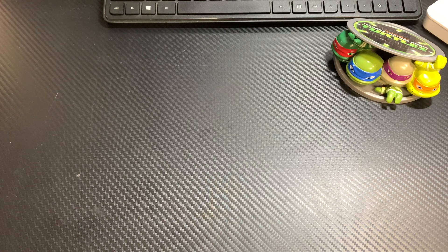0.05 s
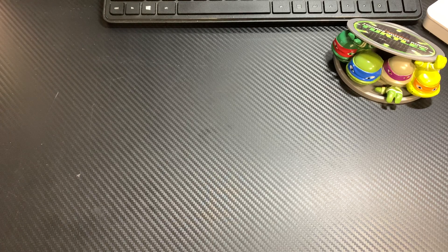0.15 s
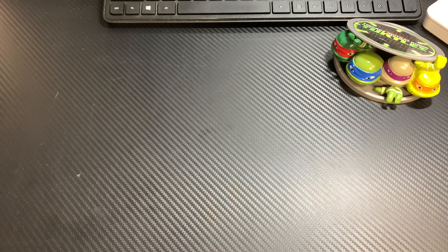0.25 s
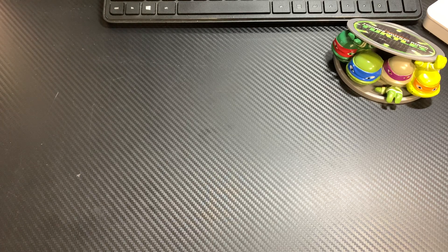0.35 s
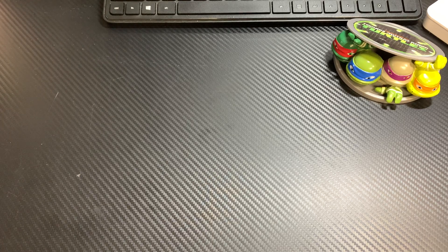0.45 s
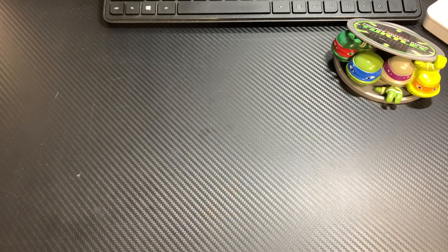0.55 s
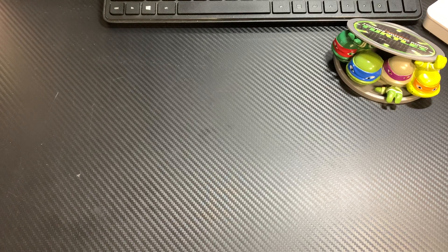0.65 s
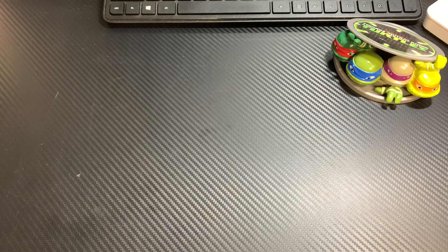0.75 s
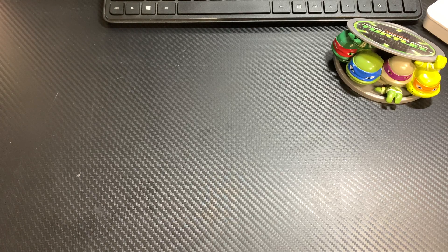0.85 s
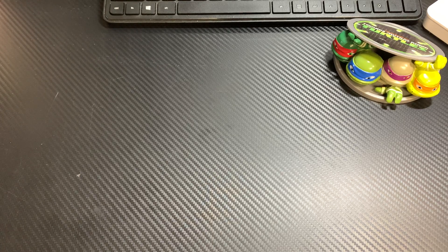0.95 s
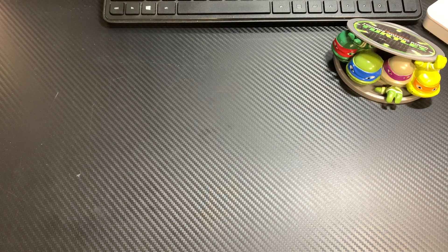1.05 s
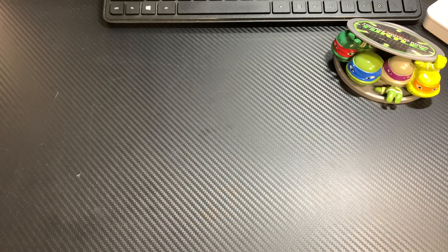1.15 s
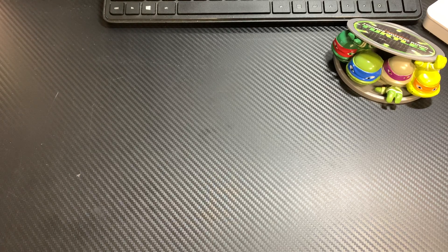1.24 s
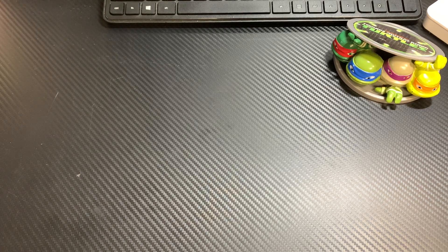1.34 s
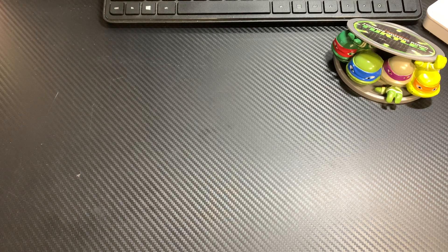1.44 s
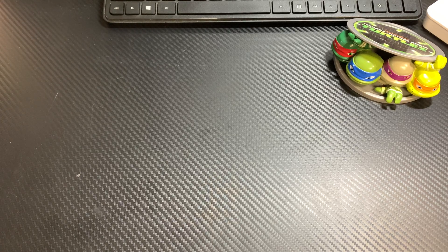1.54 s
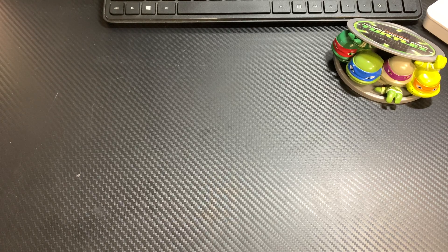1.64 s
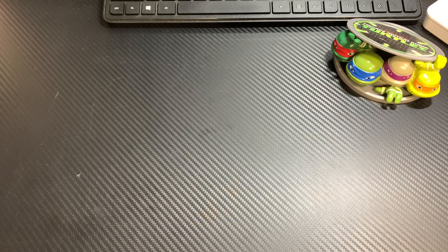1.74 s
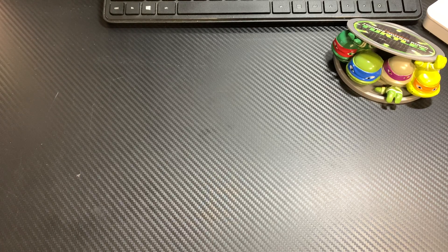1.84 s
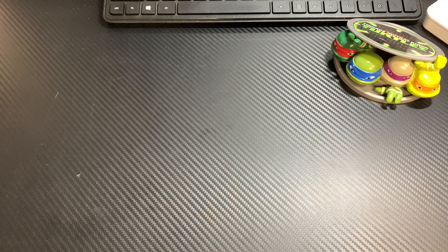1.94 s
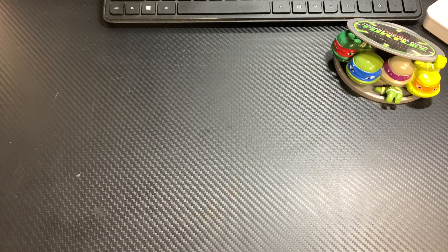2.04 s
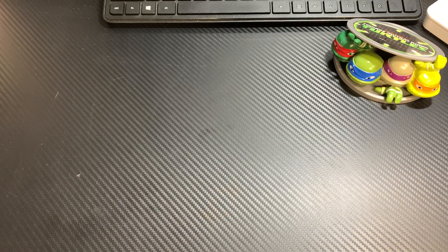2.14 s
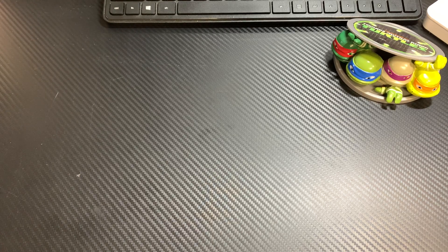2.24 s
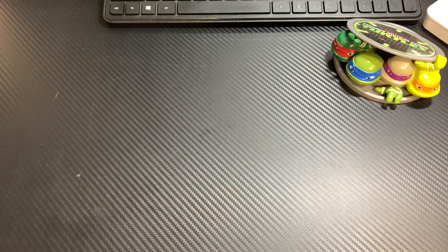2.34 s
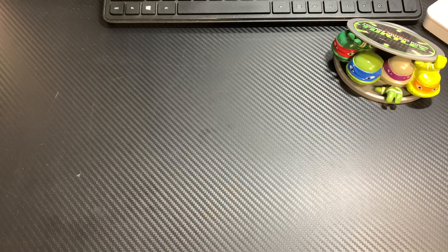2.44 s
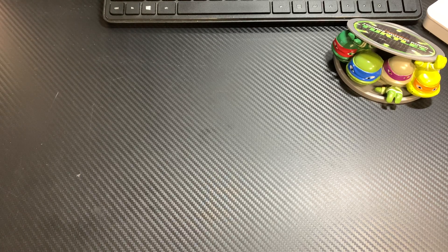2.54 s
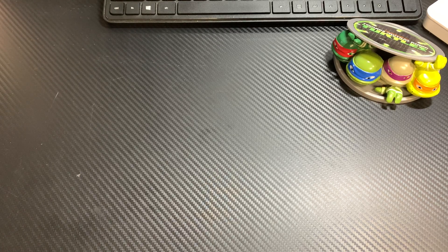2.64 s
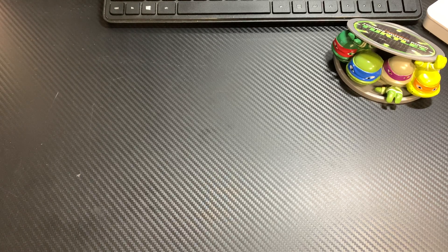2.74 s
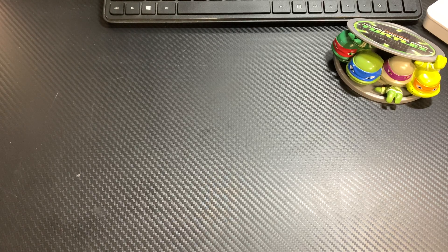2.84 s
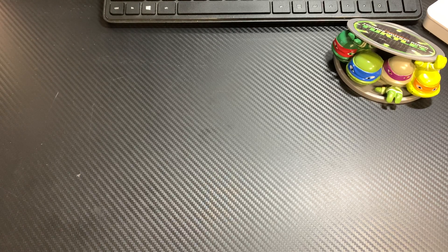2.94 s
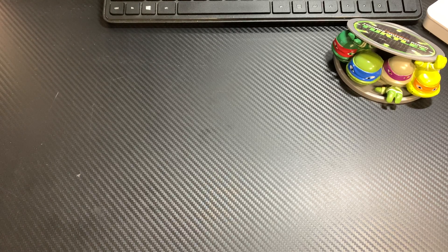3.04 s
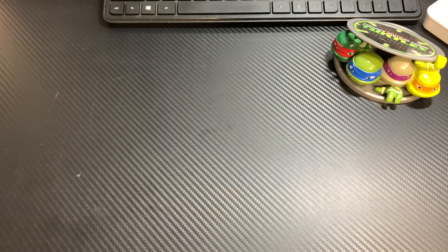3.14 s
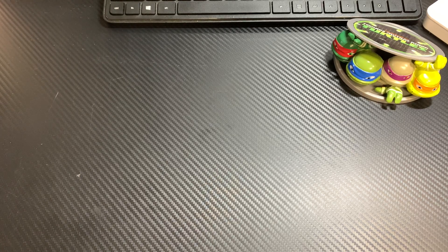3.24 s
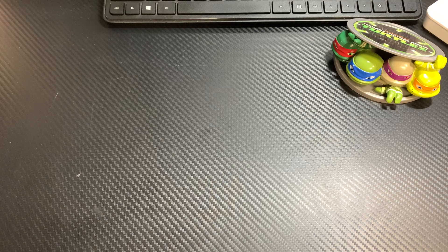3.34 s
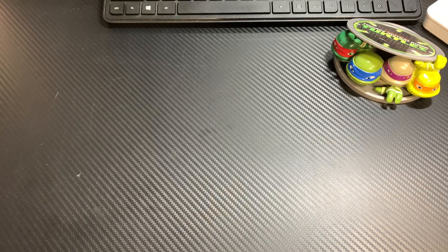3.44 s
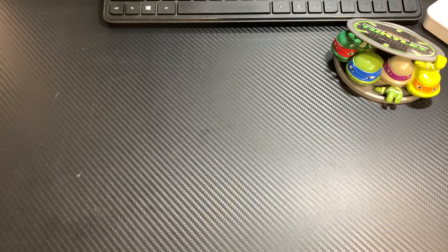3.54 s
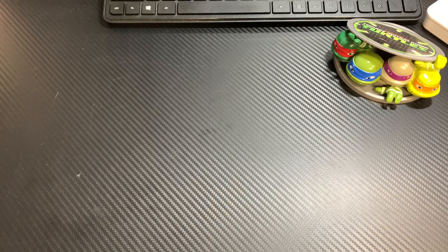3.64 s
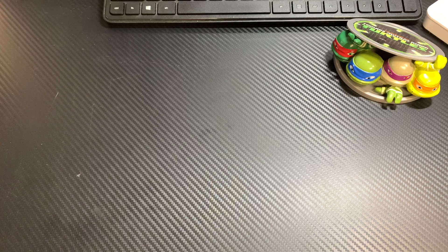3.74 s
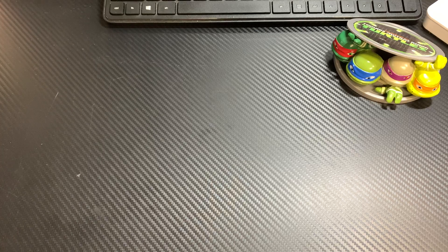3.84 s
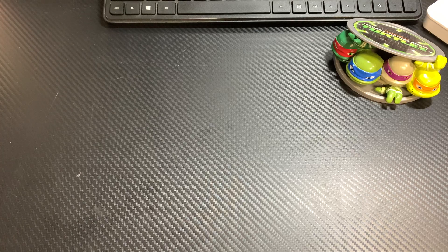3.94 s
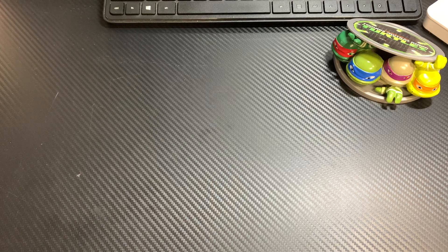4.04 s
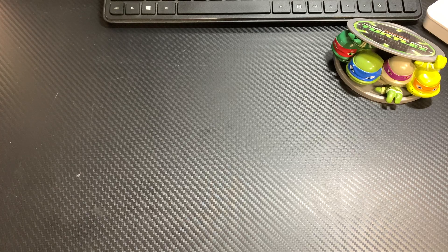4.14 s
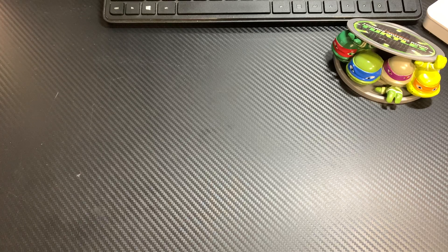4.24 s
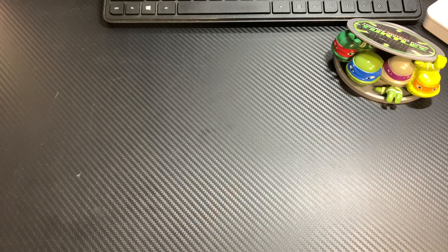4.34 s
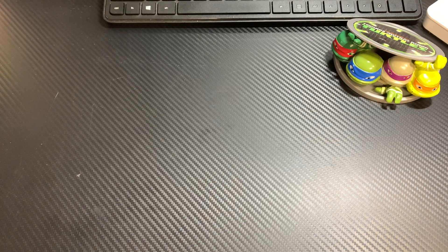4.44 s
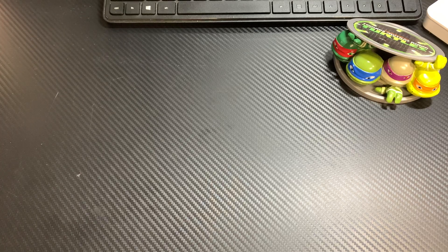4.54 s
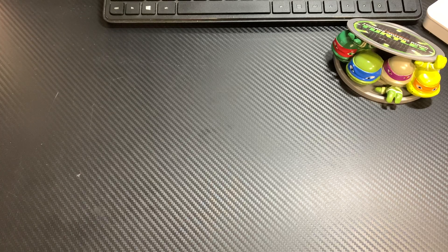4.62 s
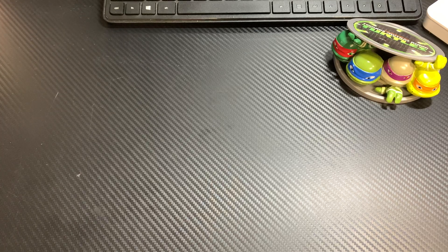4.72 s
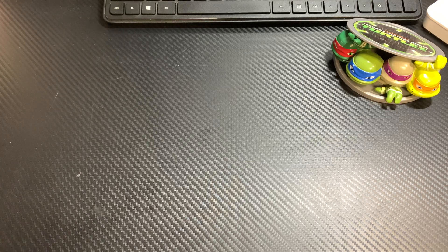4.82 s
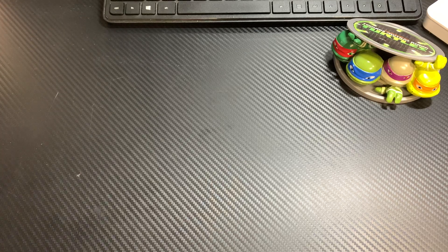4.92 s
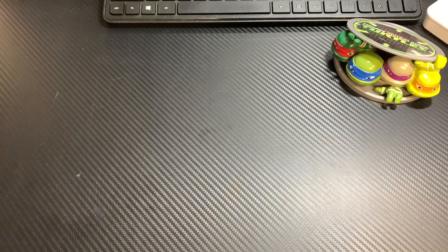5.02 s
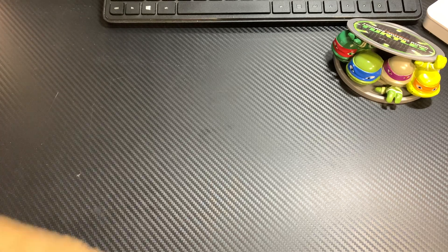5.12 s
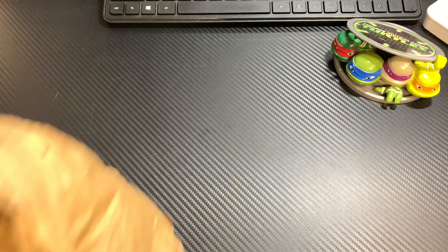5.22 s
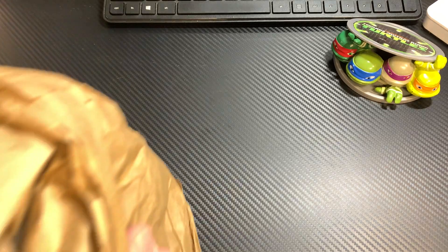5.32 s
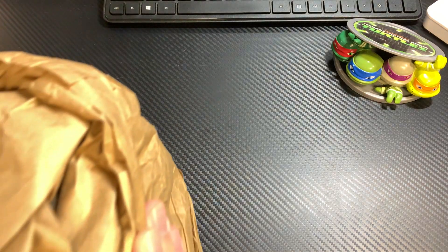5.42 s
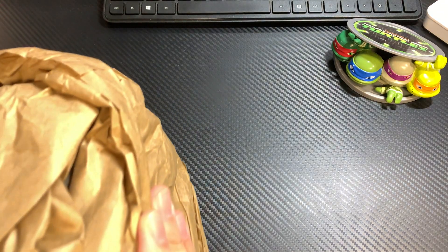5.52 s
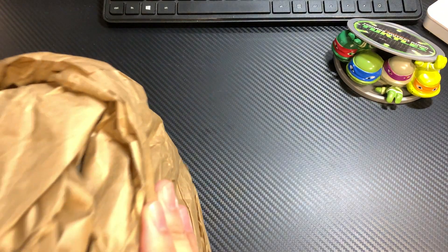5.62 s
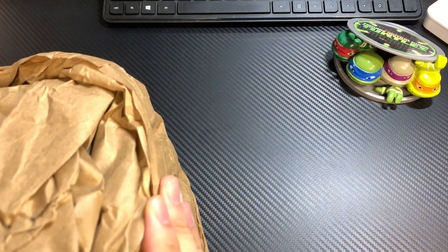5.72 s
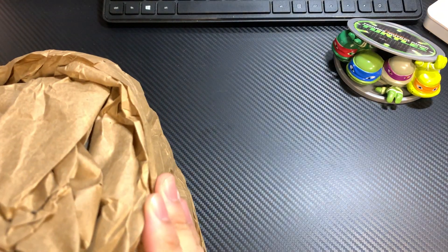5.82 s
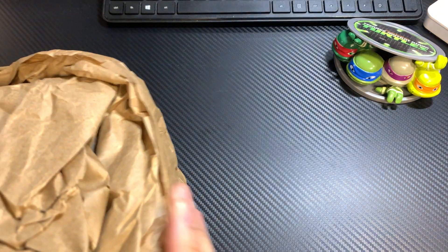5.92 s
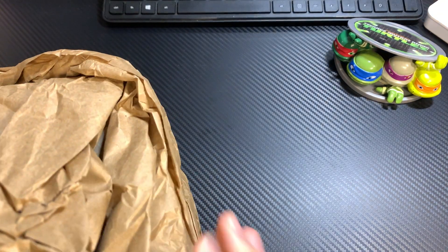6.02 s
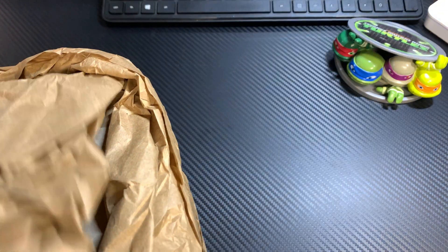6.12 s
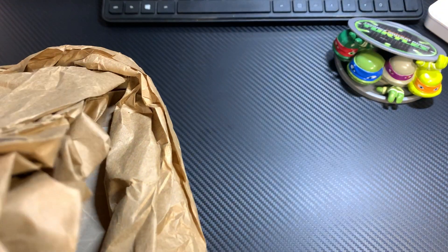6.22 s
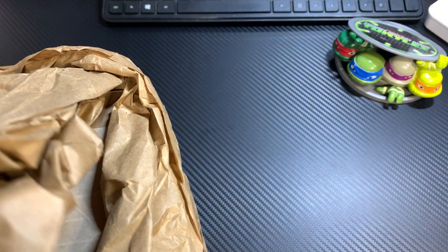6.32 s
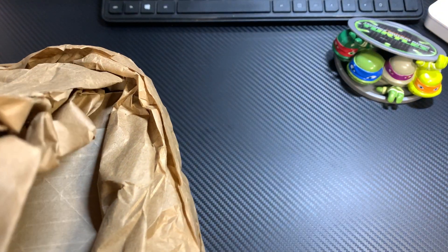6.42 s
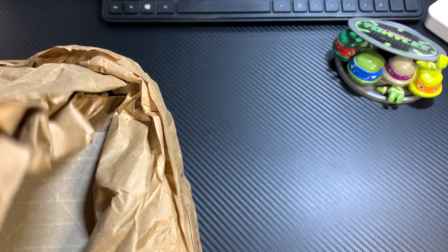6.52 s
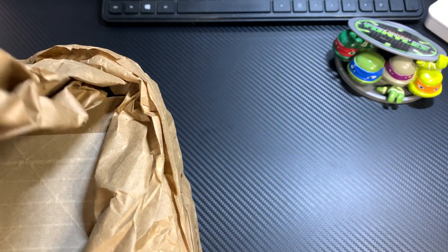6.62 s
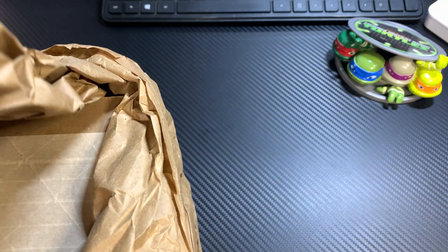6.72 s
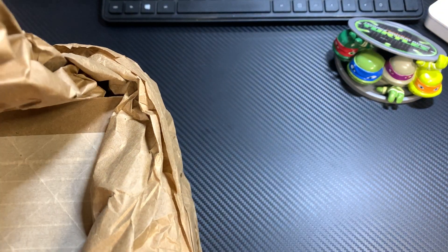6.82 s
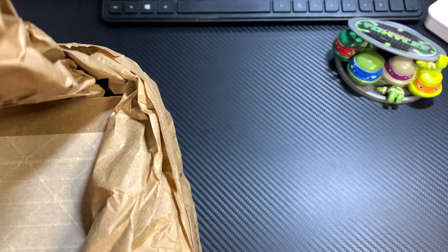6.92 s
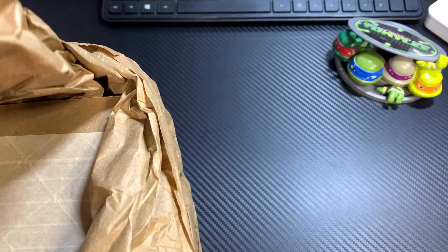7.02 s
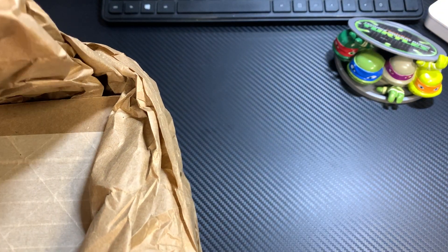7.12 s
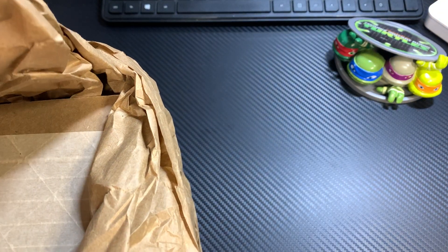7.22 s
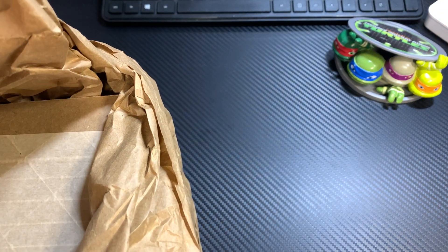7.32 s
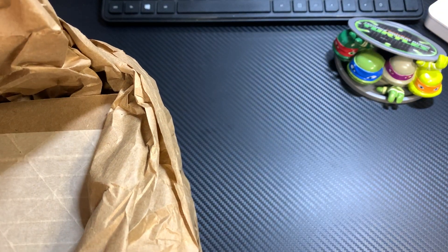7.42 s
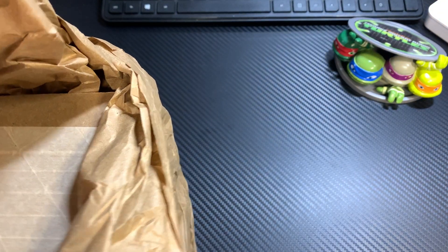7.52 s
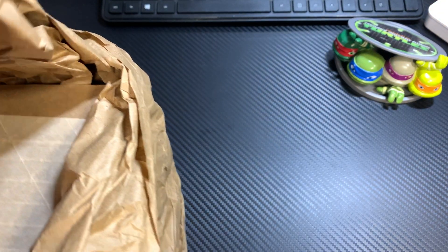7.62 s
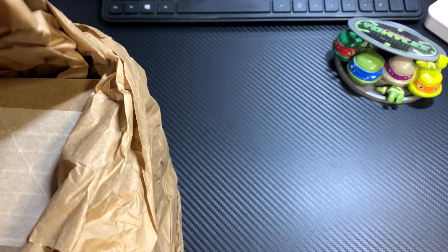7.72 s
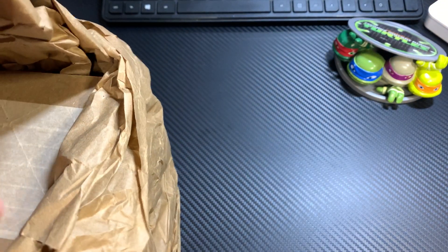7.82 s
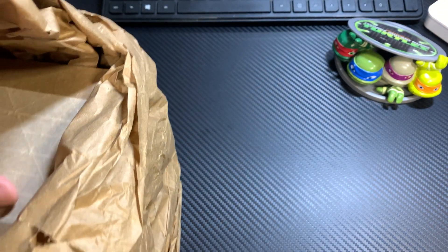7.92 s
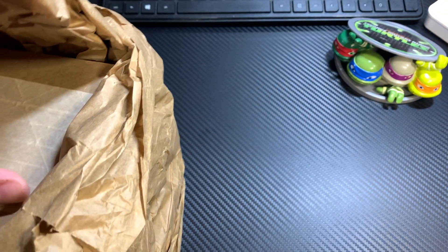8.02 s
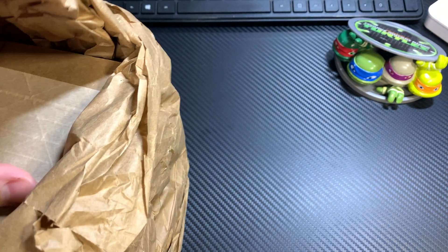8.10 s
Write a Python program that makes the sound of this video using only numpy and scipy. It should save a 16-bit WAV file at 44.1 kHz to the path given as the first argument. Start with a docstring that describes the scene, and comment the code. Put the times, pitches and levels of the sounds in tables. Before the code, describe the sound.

In a small, quiet, dry room, stiff packing paper is pushed about in a cardboard box, first off to the left. A short rustle with soft bumps nearly stops, then loud snaps and a hard box knock follow. Crinkles, hollow tocks, ticks and faint cardboard groans continue. Around five seconds it moves close to the stereo microphone, with thin swishes, brighter cracks and low thumps to the end.

```python
"""Stiff packing paper is pushed about in a cardboard box, heard in a small quiet room.
At first it rustles off to the left with a few box bumps, almost stops after a third of a second, then snaps loudly.
Rustles, hollow fold tocks, lone ticks, desk rumble and short cardboard groans follow, then denser snaps.
From about five seconds paper and box come close: thin swishes, then sharper snaps and bumps to the end.
Paper is made from bursts of shaped noise and moving noise bands, cardboard from ringing tones and low noise."""
import sys
import numpy as np
from scipy import signal
from scipy.fft import rfft, irfft, next_fast_len
from scipy.io import wavfile
from scipy.ndimage import map_coordinates

SR = 44100
rng = np.random.default_rng(int(sys.argv[2]) if len(sys.argv) > 2 else 0)


def transcribe(u):
    """Save the signal u as a 16-bit wav file named by the first command-line argument.

    u: samples, shape (n,) or (channels, n), limited to [-1, 1]; the rate is SR.
    q: integer samples, one column per channel.
    """
    v = np.clip(np.atleast_2d(u).T, -1, 1)
    q = np.round(v * 32767).astype(np.int16)
    wavfile.write(sys.argv[1], SR, q)


N = 359856


def from_db(db):
    """Turn decibels into a gain."""
    return 10 ** (np.asarray(db) / 20)


def to_db(power):
    """Turn power into decibels."""
    return 10 * np.log10(power + 1e-20)


def rms_one(x):
    """Scale a sound to an rms of 1."""
    return x / np.sqrt(np.mean(x ** 2) + 1e-20)


def in_time(rows):
    """Draw straight lines through the rows of a table, giving each column at every sample."""
    s, *columns = np.transpose(rows)
    return [np.interp(np.arange(N) / SR, s, c) for c in columns]


def at_hz(points, hz):
    """Read a table of values on a log-frequency axis."""
    known_hz, values = np.transpose(points)
    return np.interp(np.log(hz + 1), np.log(known_hz), values)


def coloured(x, spectrum):
    """Filter a sound by a spectrum in dB."""
    size = next_fast_len(x.shape[-1])
    gain = from_db(at_hz(spectrum, np.fft.rfftfreq(size, 1 / SR)))
    return irfft(rfft(x, size) * gain, size)[..., :x.shape[-1]]


def drift(rate):
    """Wander at random: straight lines between chance values of spread 1, `rate` of them per second."""
    knots = rng.standard_normal(int(rate * N / SR) + 2)
    return np.interp(np.arange(N) * rate / SR, np.arange(len(knots)), knots)


def add(out, s, sound):
    """Mix a short sound in at a time in seconds."""
    start = int(np.clip(s * SR, 0, N - 1))
    out[:, start:start + sound.shape[-1]] += sound[..., :N - start]


def gesture(s, swell_s, fade_s):
    """Power of one movement: a rounded swell by 20 dB up to its height, then a fade of 20 dB per fade_s."""
    t = np.arange(N) / SR - s
    steps = np.where(t < 0, (t / swell_s) ** 2, t / fade_s)
    return from_db(-20 * np.minimum(steps, 10)) ** 2


def hiss(spectrum):
    """Make smooth noise of a given colour; rms 1."""
    return rms_one(coloured(rng.standard_normal((2, N)), spectrum))


def facets(spectrum, crack_s, ring_db, ring_s, uneven_db, count, size):
    """Facets of paper flick over: each a quick run of tiny slips and a short ring, with its own resonances."""
    t, hz = np.arange(size) / SR, np.fft.rfftfreq(size, 1 / SR)
    # every facet gets chance peaks and dips on top of the common spectrum
    peaks = np.geomspace(100, 18000, num=30)
    tents = np.array([np.interp(hz, peaks, row) for row in np.eye(len(peaks))])
    colour_db = at_hz(spectrum, hz) + uneven_db * rng.standard_normal((count, len(peaks))) @ tents
    slips = rng.laplace(size=(2, count, size))
    waves = rms_one(irfft(rfft(slips) * from_db(colour_db), size))
    rise = 1 - np.exp(-(t / (1.32 * crack_s)) ** 2)
    decay = np.exp(-t / crack_s) + from_db(ring_db) * np.exp(-t / ring_s)
    return waves * rise * decay * (1 - t / t[-1])


def crinkles(busy, spread_db, spectrum, crack_s, ring_db, uneven_db, count=3000):
    """Creases give way at random, mostly small and a few large; busy is the share of them that do; rms 1."""
    times, chance = rng.random((2, count))
    sizes = from_db(spread_db * np.minimum(rng.exponential(1, count), 3.4))
    waves = facets(spectrum, crack_s, ring_db, 0.14, uneven_db, count=count, size=512)
    out = np.zeros((2, N))
    for k in np.flatnonzero(chance < busy[(times * N).astype(int)]):
        add(out, times[k] * N / SR, sizes[k] * waves[:, k])
    return rms_one(out)


def rubbing(spectrum, patchy_db, width_hz, size=1024):
    """Sheets slide and bend: resonances of the pockets between them come and go in the noise; rms 1."""
    hz, _, frames = signal.stft(rng.standard_normal((2, N)), SR, nperseg=size)
    pockets = rng.standard_normal((size // 2, frames.shape[-1]))
    # the patches of pitch are width_hz apart at the bottom and wider higher up
    step = np.log1p(hz / 2500) * 2500 / width_hz
    place = np.meshgrid(step, np.arange(frames.shape[-1]), indexing="ij")
    patches = map_coordinates(pockets, place, order=1)
    colour_db = at_hz(spectrum, hz)[:, None] + patchy_db * patches
    return rms_one(signal.istft(frames * from_db(colour_db), SR, nperseg=size)[1][:, :N])


# how far paper and box have come under the microphone: (time [s], nearness [share 0-1])
NEARNESS = [(4.9, 0.41), (5.7, 1)]


def nearness():
    """The share of the sound that comes from close by, at every sample."""
    return in_time(NEARNESS)[0]


# colour of the quiet air: (frequency [Hz], level [dB per Hz])
AIR_SPECTRUM = [(20, -26), (70, -1), (250, 9), (900, 0.5), (4000, -6), (16000, -72)]


def room_air():
    """The air of the room is a faint, steady noise."""
    return from_db(-68.5) * hiss(AIR_SPECTRUM)


def room(x, t60, wet_db, size=22050):
    """Desk and walls return a short tail: fading noise, dullest in the top treble, that starts 4 ms late."""
    t = np.arange(size) / SR
    tail = coloured(rng.standard_normal((2, size)), [(200, -3.5), (2000, 3.0), (6000, -2), (16000, -5.0)])
    tail = tail * from_db(-60 * t / t60) * (t > .004)
    tail = tail / np.sqrt(np.sum(tail[0] ** 2))
    return x + from_db(wet_db) * signal.oaconvolve(x, tail, axes=1)[:, :N]


# shoves of the box, before a fixed trim:
# (time of the height [s], deep rumble level [dB], wall flutter level [dB])
SHOVES = [(0.0, -33, -31.5), (0.13, -41, -39.5), (0.26, -57, -52), (0.86, -51, -62), (1.072, -57, -40),
          (2.0, -45, -62), (2.4, -39.5, -41.5), (2.75, -47, -45.5), (3.61, -44, -70), (4.05, -46, -45),
          (4.58, -46, -52), (5.8, -40.5, -59), (6.23, -37, -53), (6.93, -42, -43.5), (7.52, -59, -32),
          (7.61, -44, -52), (7.75, -38, -55)]
# colour of the rumble on the desk: (frequency [Hz], level [dB per Hz])
RUMBLE_SPECTRUM = [(20, -48), (35, -31), (48, -4.5), (80, -0.5), (105, -5.5), (135, -7.5), (170, -15.5),
                   (400, -47)]
# colour of the fluttering walls: (frequency [Hz], level [dB per Hz])
FLUTTER_SPECTRUM = [(70, -45), (140, 3.5), (190, -13.5), (265, 2), (370, -8.5), (600, -15), (1500, -33)]
SHOVE_SWELL_S, SHOVE_FADE_S = 0.051, 0.13
# rubbing paper drags the box along: dB against the rubbing, and how unevenly
DRAG_RUMBLE_DB, DRAG_FLUTTER_DB, DRAG_UNEVEN_DB = -22, -16, 6


def shifting(rubbing_db):
    """The box rumbles on the desk and its walls flutter: a little as the paper rubs, more when shoved."""
    drag_db = np.array([[DRAG_RUMBLE_DB], [DRAG_FLUTTER_DB]])
    power = from_db(rubbing_db + DRAG_UNEVEN_DB * drift(14) + drag_db) ** 2
    for s, rumble_db, flutter_db in SHOVES:
        shove = gesture(s, SHOVE_SWELL_S, SHOVE_FADE_S)
        power = power + from_db([[rumble_db], [flutter_db]]) ** 2 * shove
    rumble_db, flutter_db = to_db(power)
    rumble = from_db(rumble_db - 4.0) * hiss(RUMBLE_SPECTRUM)
    flutter = from_db(flutter_db - 3.0) * rubbing(FLUTTER_SPECTRUM, patchy_db=4.0, width_hz=51.0)
    return rumble + flutter


# cardboard dragging on cardboard; pitch and level waver, level before a trim:
# (time [s], length [s], pitch [Hz], level [dB])
GROANS = [(0.11, 0.093, 518, -48.5), (3.41, 0.13, 139, -44.5), (4.2, 0.085, 255, -49),
          (4.225, 0.11, 145, -43.5), (5.362, 0.17, 260.4, -58)]


def groans():
    """Cardboard sticks and slips at an unsteady rate, in a brief low tone."""
    out = np.zeros((2, N))
    for s, length_s, hz, level_db in GROANS:
        swell = signal.windows.tukey(int(length_s * SR), .6)
        turns = np.cumsum(hz * (1 + 0.013 * drift(114)[:len(swell)])) / SR
        loudness = from_db(level_db + 1.0 + 3.5 * drift(70)[:len(swell)])
        add(out, s, loudness * swell * np.sin(2 * np.pi * turns))
    return out


# blows on the box: (time [s], peak level of the bulge [dB], centre of the blow [Hz])
BUMPS = [(0.002, -32, 110), (0.11, -40, 199), (0.232, -50, 290), (1.038, -17, 490), (1.042, -18.5, 286),
         (1.071, -34, 460), (4.051, -35, 333), (4.558, -26.5, 428), (4.561, -33.5, 92.5),
         (5.134, -36.5, 232), (5.174, -38, 140), (5.684, -22, 76), (5.733, -35, 121), (6.206, -30, 87),
         (6.323, -34.5, 170), (6.331, -29.5, 480), (6.629, -34.5, 334), (6.858, -33.5, 126),
         (6.911, -29.5, 193), (7.281, -29.5, 266), (7.509, -28, 229), (7.588, -31, 96), (7.737, -23.5, 526)]
# tones of the cardboard walls, varied at each blow:
# (usual pitch [Hz], usual strength [dB], time to fade by 60 dB [s])
WALL_TONES = [(82, -18, 0.2), (133.5, -7, 0.15), (196, -6, 0.079), (263.3, -3, 0.09), (320, -10, 0.18),
              (466, 9, 0.11)]
# a wall bulges and springs back; its tones ring on more faintly
BUMP_CYCLES, BUMP_CONTACT_S, BUMP_RING_DB = 2.1, 0.008, -10.5


def bumps(size=22050):
    """Each blow bends a wall for a few cycles, then the cardboard tones near its pitch ring on."""
    out, t = np.zeros((2, N)), np.arange(size) / SR
    hz, tone_db, t60 = np.transpose(WALL_TONES)[:, :, None]
    for s, peak_db, centre_hz in BUMPS:
        length_s = BUMP_CONTACT_S + BUMP_CYCLES / centre_hz
        push = np.sin(np.pi * np.minimum(t / length_s, 1)) ** 2
        bulge = push * np.exp(2j * np.pi * centre_hz * t)
        # tones far from the pitch of the blow are weaker
        far_db = 3.1 * np.log2(hz / centre_hz) ** 2
        strength = from_db(tone_db - far_db + 1.5 * rng.standard_normal(hz.shape))
        bent_hz = hz * (1 + 0.03 * rng.standard_normal(hz.shape))   # the walls flex under the hand
        tones = np.exp(2j * np.pi * (bent_hz * t + rng.random(hz.shape)))
        ring = np.sum(strength * tones * from_db(-60 * t / t60), axis=0)
        ring = ring * (1 - np.exp(-(t / length_s) ** 2))
        knock = from_db(peak_db) * (bulge + from_db(BUMP_RING_DB) * ring / np.abs(ring).max())
        # the two parts are the same knock a quarter turn apart
        add(out, s, np.array([knock.real, knock.imag]))
    return out


# resonances of the hollow box, which shift about these values:
# (centre [Hz], distance to either side where the lift has dropped to 37 % [Hz], usual lift [dB])
HOLLOW = [(475, 45, 5), (1140, 70, 3), (1400, 50, 3), (2030, 70, 3)]
# the paper shifts inside: share of the pitch, share of the lift, rate
HOLLOW_BEND, HOLLOW_COMES_AND_GOES, HOLLOW_CHANGES_PER_S = .05, .9, 8


def in_box(x, size=2048):
    """Standing waves between the box walls lift some pitches; they bend, come and go as the paper shifts."""
    hz, s, frames = signal.stft(x, SR, nperseg=size)
    now, colour_db = np.minimum((s * SR).astype(int), N - 1), 0
    for centre_hz, width_hz, lift_db in HOLLOW:
        bent_hz = centre_hz * (1 + HOLLOW_BEND * drift(HOLLOW_CHANGES_PER_S)[now])
        depth = 1 + HOLLOW_COMES_AND_GOES * drift(HOLLOW_CHANGES_PER_S)[now]
        depth_db = lift_db * np.clip(depth, 0, np.sqrt(2))
        colour_db = colour_db + depth_db * np.exp(-((hz[:, None] - bent_hz) / width_hz) ** 2)
    return signal.istft(frames * from_db(colour_db), SR, nperseg=size)[1][:, :N]


# a taut sheet slides over the rim, its level wavering:
# (time of the height [s], swell [s], fade by 20 dB [s], usual level [dB])
SWISHES = [(5.0, 0.078, 0.22, -34.5), (5.14, 0.07, 0.048, -31), (5.24, .08, 0.16, -37.5),
           (6.195, 0.038, 0.13, -27)]
# colour of the swish: (frequency [Hz], level [dB per Hz])
SWISH_SPECTRUM = [(3000, -30), (4900, -24), (5600, 6), (6600, 0), (7500, 1), (9000, -12), (15000, -11)]


def swishes():
    """A sheet drawn over the rim hisses thinly, in a narrow, shifting band."""
    power = 0
    for s, swell_s, fade_s, level_db in SWISHES:
        power = power + from_db(level_db) ** 2 * gesture(s, swell_s, fade_s)
    waver = from_db(1.8 * drift(250))
    return np.sqrt(power) * waver * rubbing(SWISH_SPECTRUM, patchy_db=7.0, width_hz=160.5)


# broad folds that flip over, before the trim FOLD_DB: (time [s], level [dB], pitch [Hz])
FOLDS = [(0.831, -30, 1170), (1.041, -22, 2020), (1.043, -23, 1730), (1.089, -31.5, 1200),
         (1.578, -22.5, 1010), (1.738, -26, 1380), (1.900, -31, 1670), (1.906, -29, 840),
         (2.265, -28.5, 1210), (2.284, -23, 810), (2.439, -35, 1410), (2.588, -30.5, 1270),
         (2.931, -34, 1800), (3.19, -35.5, 850), (3.027, -36, 880), (3.065, -29, 3220), (3.31, -26, 950),
         (3.869, -29, 1660), (4.019, -26.5, 785), (4.56, -27, 1100), (4.6277, -21.5, 1290),
         (4.672, -29.5, 1050), (4.837, -24, 695), (5.136, -29, 1450), (5.174, -19, 1390),
         (5.259, -23, 2040), (5.7622, -20.5, 960), (5.828, -37, 1400), (5.934, -21, 1530),
         (6.332, -18.5, 1600), (6.4768, -21, 1600), (6.627, -21.5, 1150), (7.054, -31, 1730),
         (7.2598, -24, 1700), (8.061, -17, 1130), (8.0609, -15.5, 2300)]
FOLD_DB = -3
FOLD_RISE_S, FOLD_FADE_S = .001, .0042
FOLD_WIDTH_HZ, FOLD_SKIRT_DB = 330, -16   # width of the resonance, and the broad sound around it


def folds(size=2048):
    """A broad fold flips with a hollow tock: a brief flurry of slips rings the pocket of paper behind it."""
    out, t, hz = np.zeros((2, N)), np.arange(size) / SR, np.fft.rfftfreq(size, 1 / SR)
    shape = (1 - np.exp(-(t / FOLD_RISE_S) ** 2)) * np.exp(-t / FOLD_FADE_S)
    for s, level_db, pitch_hz in FOLDS:
        ratio = hz / pitch_hz
        resonance = 1 / (1 + 2j * (hz - pitch_hz) / FOLD_WIDTH_HZ)
        skirt = from_db(FOLD_SKIRT_DB) * ratio / (1 + (ratio / 2) ** 3)
        slips = rng.standard_normal((2, size))
        tock = shape * irfft(rfft(slips) * (resonance + skirt), size)
        level = from_db(level_db + FOLD_DB) * np.sqrt(FOLD_FADE_S * SR / size)
        add(out, s, level * rms_one(tock))
    return out


# creases that snap, before fixed trims:
# (time [s], crack level [dB], sheet against the crack [dB], top treble against the crack [dB])
SNAPS = [(0.466, -57.5, -12, -16), (0.8859, -25.5, -7, -6), (0.893, -19.5, -9.5, -7), (0.9653, -26, 3, -1),
         (1.0385, -24, 1.5, 0), (1.151, -35.5, -1, -9), (1.281, -31.5, 1, 2), (1.3246, -34.5, 2, 7),
         (1.8346, -34.5, 6, -35), (2.544, -39, -1, 2), (2.647, -49, -10, 2), (2.7336, -37, -27, 6),
         (2.852, -47, -17, 5), (3.0622, -44, 0, -2), (3.3035, -26.5, -4, 0.5), (3.3823, -26, -21, 2.5),
         (3.452, -22.5, -10, -15), (3.4836, -27, 0, -12), (3.566, -29.5, -3, -7), (3.696, -30, -9, -13),
         (3.7127, -36.5, -13, 8), (3.7212, -27, -3.5, -3), (3.817, -30, -11, 4), (4.0614, -35, -8, -1),
         (4.29, -39.5, 1, 5), (4.3987, -30, -3, 3), (4.5312, -25.5, -10, -2), (4.589, -39, 2, 2),
         (4.6275, -22.5, -3.5, -1), (4.775, -31, -14, -8), (4.8355, -26, 1, -2), (4.8408, -30, 1, 14),
         (5.0552, -16.5, -41, -9), (5.127, -25, 0, 1), (5.1484, -29, -10, -6), (5.1717, -14.5, -4, 0.5),
         (5.2477, -27, -21, -25), (5.3811, -26.5, -16, -1.5), (5.45, -53, -12, -12), (5.516, -44.5, -1, -2),
         (5.6583, -46, -10, -3), (5.7393, -25.5, -1.5, 2), (5.7608, -26, 1.5, -8), (5.8436, -27, -5, 2.5),
         (5.9332, -31.5, 10, 2), (5.9625, -20.5, -5, 1.5), (6.0196, -12, -10.5, -8), (6.124, -26, -2, -30),
         (6.331, -43, 0, 3), (6.4496, -28, -0.5, 1), (6.4759, -17.5, -4.5, 4.5), (6.6166, -20.5, -3, -20),
         (6.6259, -19, -2, 5.5), (6.8132, -25.5, -6, -8), (6.8555, -23, -10, -6), (6.9662, -33, 3.5, -8),
         (6.9955, -32, -15, 2), (7.007, -29.5, -2, -7), (7.1586, -33, -11, 0), (7.219, -49, -20, 13),
         (7.229, -41, -18, 6), (7.2594, -27.5, -9, 1), (7.3021, -22.5, -27, 5.5), (7.32, -41, -14, 6),
         (7.3343, -28.5, -27, 3), (7.3617, -27, -17, 6), (7.495, -27, 5.5, 4), (7.555, -24.5, -13, 4.5),
         (7.6402, -15.5, -14, -1), (7.6965, -34, -18, 12), (7.7078, -25, -16, -4), (7.738, -28, -14, -4),
         (8.051, -24, -4, -0.5), (8.0614, -16, -11.5, -6)]
# colour of the crack: (frequency [Hz], level [dB per Hz])
CRACK_SPECTRUM = [(500, -20), (1500, -18.5), (2500, -1), (4500, -2.5), (7000, 3.5), (11000, -1.5),
                  (15500, -6.5)]
# colour of the sheet around it: (frequency [Hz], level [dB per Hz])
SHEET_SPECTRUM = [(150, -18.5), (450, -8.5), (800, -8), (1300, 4), (2000, 3.5), (3000, -7), (6000, -22)]


def snaps(window_s=0.004):
    """A stiff fold buckles: a sharp crack, longer for a broad fold, then the sheet around it answers lower."""
    out = np.zeros((2, N))
    for s, crack_db, body_db, top_db in SNAPS:
        crack_s = .0015 * from_db(.32 * body_db)
        crack = facets(CRACK_SPECTRUM, crack_s, ring_db=-29, ring_s=.007, uneven_db=2.5,
                       count=1, size=2048)[:, 0]
        crack = coloured(crack, [(6000, 0), (9500, top_db)])
        sheet = facets(SHEET_SPECTRUM, crack_s=.0018, ring_db=-22, ring_s=.012, uneven_db=3.0,
                       count=1, size=2048)[:, 0]
        # levels stand for the whole energy packed into window_s
        spread = np.sqrt(window_s * SR / crack.shape[-1])
        crack_level = from_db(crack_db - 0.5) * np.hypot(1, from_db(top_db))
        add(out, s, crack_level * spread * rms_one(crack))
        add(out, s + 0.00027, from_db(crack_db + body_db - 1.1) * spread * rms_one(sheet))
    return out


# pushes and pulls of the paper, one rustle each; taut paper has more top treble:
# (time of the height [s], swell [s], fade by 20 dB [s], crinkle level [dB],
#  sheet rubbing against the crinkle [dB], top treble against the crinkle [dB])
RUSTLES = [(0.0, 0.08, 0.081, -42.5, 5, -3), (0.129, 0.097, 0.12, -43.5, 1, -18),
           (0.485, 0.03, 0.62, -58.5, 8, -21), (0.901, 0.19, 0.064, -29, -3, -4.5),
           (1.091, 0.3, 0.048, -33, -2, -3.5), (1.38, 0.14, 0.039, -31.5, -1, -3),
           (1.589, 0.11, 0.19, -29.5, 0.5, -4.5), (1.747, 0.07, 0.25, -41, 7, -16),
           (1.905, 0.071, 0.13, -37, 2, -8), (1.975, 0.12, 0.42, -37.5, 0.5, -4.5),
           (2.28, 0.037, 0.25, -29.5, -0.5, -3), (2.389, 0.03, 0.1, -27.5, -1.5, -3),
           (2.738, 0.012, 0.056, -25.5, -6, -5.5), (2.87, 0.038, 0.16, -40, -2, -4.5),
           (2.945, 0.022, 0.16, -42.5, 2.5, -4), (3.07, 0.052, 0.032, -37.5, 0.5, -1.5),
           (3.19, 0.11, 0.12, -34.5, -0.5, -5), (3.311, 0.056, 0.42, -32, -6, -4),
           (3.51, 0.14, 0.56, -32.5, -3.5, 0), (3.6, 0.037, 0.039, -29.5, 2, -13),
           (3.779, 0.03, 0.1, -30, 0.5, -10), (3.88, 0.22, 0.17, -34.5, -5, 1),
           (4.069, 0.044, 0.015, -23, -5.5, -6), (4.141, 0.28, 0.13, -30.5, -2, -0.5),
           (4.411, 0.15, 0.12, -34.5, -0.5, -0.5), (4.54, 0.2, 0.19, -30, -9, -3.5),
           (4.658, 0.58, 0.097, -39.5, 2.5, -9), (4.86, 0.13, 0.11, -31.5, -7.5, -3),
           (5.15, 0.32, 0.02, -32, -13.5, 0), (5.29, 0.17, 0.095, -30, -11, -2),
           (5.751, 0.15, 0.11, -30, -6, -0.5), (6.01, 0.13, 0.27, -29, -2, -0.5),
           (6.189, 0.053, 0.17, -21, -7.5, -1.5), (6.48, 0.087, 0.11, -31, -8, -2),
           (6.638, 0.068, 0.17, -27, -11, -2), (6.84, 0.16, 0.41, -36, 1.5, -1.5),
           (6.92, 0.041, 0.023, -24, -3, 1), (7.28, 0.015, 0.029, -29.5, 2, 0.5),
           (7.52, 0.033, 0.56, -33, 4.5, 1.5), (7.745, 0.096, 0.067, -30.5, 1, 1)]
# stirring that goes on under the pushes, with quieter spells: (time [s], crinkle level [dB])
STIR = [(0, -43.5), (.38, -72), (.6, -54.5), (.85, -41.5), (2.6, -44), (2.85, -50.5), (3.5, -41),
        (4.1, -37), (4.26, -50), (4.4, -40), (5.3, -42), (5.47, -54), (5.6, -45), (5.9, -37.5), (6.9, -39),
        (7.2, -38), (7.8, -34.5), (8.16, -38)]
STIR_RUBBING_DB, STIR_TOP_DB = 1, -4.5   # slack paper rubs more and has little top treble
GRIP_UNEVEN_DB = 1.23   # the paper catches and gives under the hand


def handling():
    """Pushes add to the stirring: dB of crinkling, of rubbing, and of top treble against the crinkling."""
    stir_db, = in_time(STIR)
    power = from_db(stir_db + np.array([[0], [STIR_RUBBING_DB], [STIR_TOP_DB]])) ** 2
    for s, swell_s, fade_s, level_db, rubbing_db, top_db in RUSTLES:
        push = from_db(level_db + np.array([[0], [rubbing_db], [top_db]])) ** 2
        power = power + push * gesture(s, swell_s, fade_s)
    crinkle_db, rubbing_db, top_db = to_db(power) + GRIP_UNEVEN_DB * drift(40)
    return crinkle_db, rubbing_db, top_db - crinkle_db


# colour of the small creases: (frequency [Hz], level [dB per Hz])
CRINKLE_SPECTRUM = [(500, -40), (1200, -8), (2200, -6.5), (3200, -3), (4600, -7.5), (6500, -0.5), (7700, 0),
                    (8500, -1.5), (11000, 0), (15500, -9.5)]
# colour of the broad rubbing sheets: (frequency [Hz], level [dB per Hz])
RUBBING_SPECTRUM = [(80, -14.5), (200, -9.5), (380, -3.5), (560, -0.5), (1150, -2), (1700, -0.5),
                    (2200, -2.5), (3000, -7), (6000, -22.5)]
# colour of the lone ticks: (frequency [Hz], level [dB per Hz])
TICK_SPECTRUM = [(800, -18), (3000, -1), (9000, 0), (15000, 2)]
TICK_DB, TICK_FOLLOWS = -26.5, 0.56   # offset of the ticks, and their share of the swing of the crinkling


def rustle(crinkle_db, rubbing_db, taut_db):
    """Small creases crackle, broad sheets flap and rub; harder handling sets off more creases, in clumps."""
    busy = .7 * from_db(0.43 * (crinkle_db + 40.5) + 3 * drift(45))
    fine = crinkles(busy, spread_db=4.0, spectrum=CRINKLE_SPECTRUM, crack_s=.001,
                    ring_db=-13, uneven_db=4.5, count=2400)
    broad = crinkles(busy, spread_db=3.0, spectrum=RUBBING_SPECTRUM, crack_s=0.0016,
                     ring_db=-16, uneven_db=4.5, count=2300)
    fine_rub = rubbing(CRINKLE_SPECTRUM, patchy_db=5.0, width_hz=70)
    fine = from_db(-5.0) * fine + from_db(-3.2) * fine_rub
    # the smallest creases give lone, dry, bright ticks that carry best from close by
    tick_busy = np.clip((crinkle_db + 60) / 18, 0, 1) * (.25 + .75 * nearness())
    ticks = crinkles(tick_busy, spread_db=3.0, spectrum=TICK_SPECTRUM, crack_s=.0005,
                     ring_db=-30, uneven_db=3.5, count=230)
    top = coloured(fine, [(5000, -15), (7000, -0.5), (9000, 3.0)])
    fine = fine + (from_db(taut_db) - 1) * top
    broad_rub = rubbing(RUBBING_SPECTRUM, patchy_db=5.5, width_hz=70)
    broad = from_db(-5.0) * broad + from_db(-4.5) * broad_rub
    # ticks drop less than the crinkling does, so they stand out in the lulls
    tick_db = TICK_DB + TICK_FOLLOWS * crinkle_db
    return from_db(crinkle_db) * fine + from_db(rubbing_db - 3.5) * broad + from_db(tick_db) * ticks


# how far the left microphone port leads: (frequency [Hz], lead [radians])
LEAD = [(0, 0), (1200, .1), (2400, 1.4), (3400, 1.4), (4600, np.pi), (17500, 7 * np.pi)]


def ports(x, likeness):
    """Of two waves, one is shared by both microphone ports and one sets them apart; the left port leads."""
    size = next_fast_len(N + 2048)
    hz = np.fft.rfftfreq(size, 1 / SR)
    shared, apart = rfft(x, size)
    alike = np.clip(at_hz(likeness, hz), 0, 1)
    shared, apart = shared * np.sqrt((1 + alike) / 2), apart * np.sqrt((1 - alike) / 2)
    lag = np.exp(-1j * np.interp(hz, *np.transpose(LEAD)))
    return irfft([shared + apart, (shared - apart) * lag], size)[:, :N]


# how alike the two ports hear a sound close by: (frequency [Hz], likeness [share 0-1])
LIKENESS_CLOSE = [(100, .99), (300, .92), (700, .6), (1500, .82), (2800, .75), (4600, .93), (7800, .9),
                  (15000, .88)]
# the same for a sound off to the side: (frequency [Hz], likeness [share 0-1])
LIKENESS_ASIDE = [(100, .99), (280, .9), (450, .35), (2800, .38), (4600, .93), (7800, .88), (15000, .88)]
# paper off to the left is louder at the left port: (frequency [Hz], lift [dB])
LEFT_LIFT = [(200, -0.5), (600, 3), (1200, 4.5), (3300, 1.5), (4600, -0.5)]
# paper right under the microphone gains presence: (frequency [Hz], lift [dB])
PRESENCE = [(300, -0.5), (1500, 0.5), (2800, 0.5), (4200, 7), (5400, 1), (7000, -2), (9000, -3.5),
            (15000, -4)]


def scene():
    """Paper and box go from off to the left to under the microphone; the paper is lifted clear of the hollow."""
    near = nearness()
    crinkle_db, rubbing_db, taut_db = handling()
    box = shifting(rubbing_db) + groans() + bumps()
    loose = rustle(crinkle_db, rubbing_db, taut_db)
    lifted = (near - near.min()) / np.ptp(near)
    rustling = (1 - lifted) * in_box(loose) + lifted * loose
    paper = rustling + swishes() + folds() + snaps()
    sound = room(paper + box, t60=0.091, wet_db=-12.5) + room_air()
    left, right = ports((1 - near) * sound, LIKENESS_ASIDE)
    aside = np.array([coloured(left, LEFT_LIFT), right])
    close = ports(coloured(near * sound, PRESENCE), LIKENESS_CLOSE)
    return aside + close


CUTOFF_HZ = 16950


def record(dry):
    """The deepest bass is thinned, the highest peaks are rounded and the top is cut steeply."""
    thinned = signal.sosfilt(signal.butter(4, 37, "high", fs=SR, output="sos"), dry)
    rounded = np.tanh(thinned)
    return signal.sosfilt(signal.cheby2(20, 70, CUTOFF_HZ, fs=SR, output="sos"), rounded)


dry = scene()
out = record(dry)
transcribe(out)
```